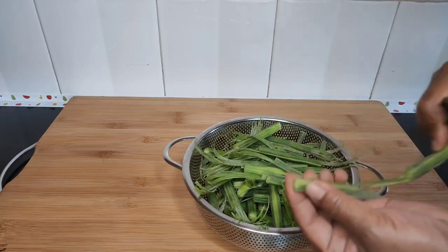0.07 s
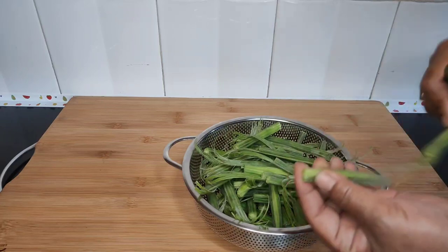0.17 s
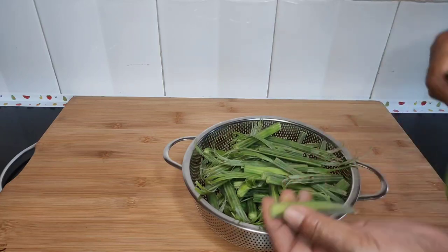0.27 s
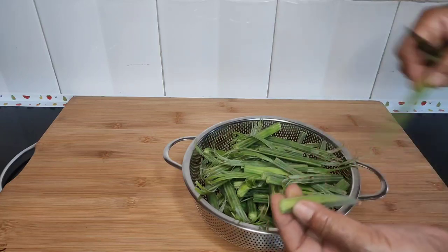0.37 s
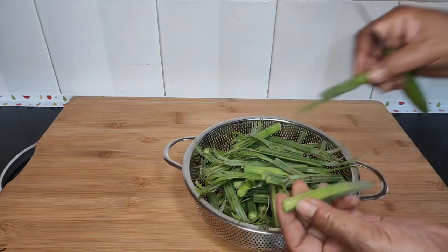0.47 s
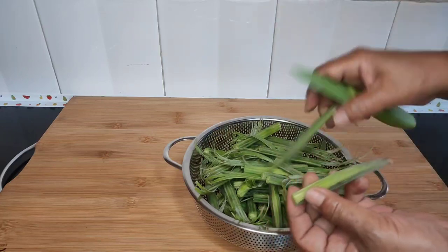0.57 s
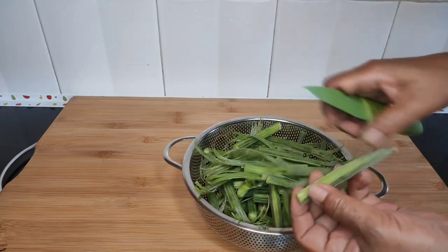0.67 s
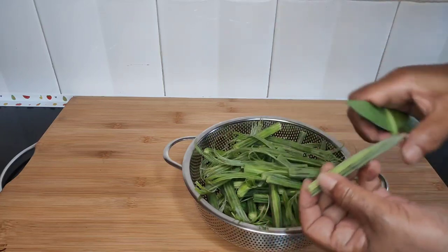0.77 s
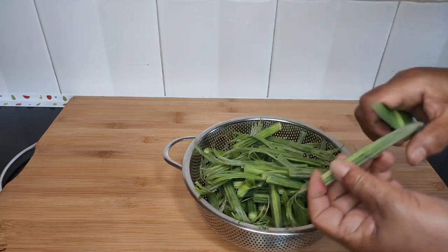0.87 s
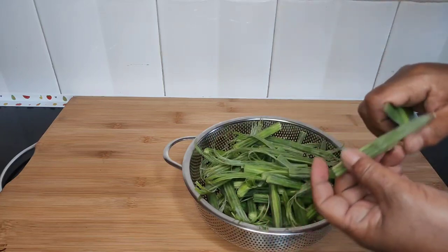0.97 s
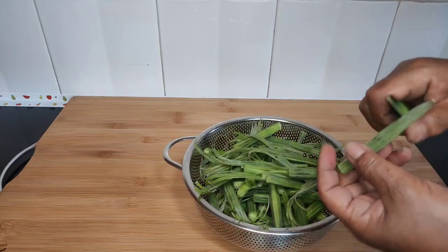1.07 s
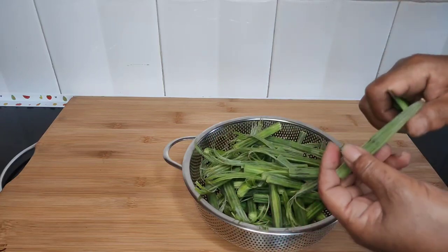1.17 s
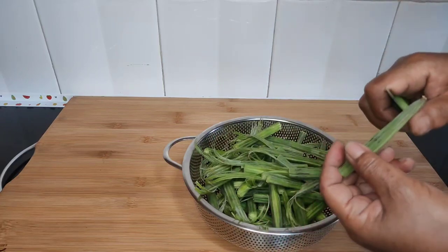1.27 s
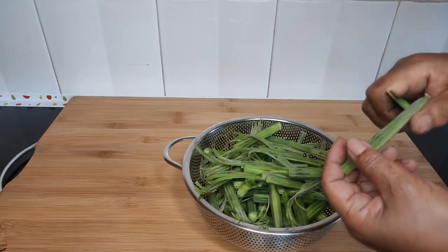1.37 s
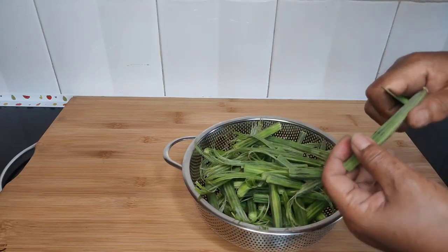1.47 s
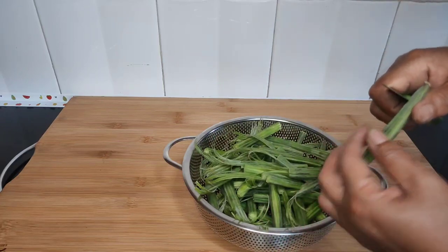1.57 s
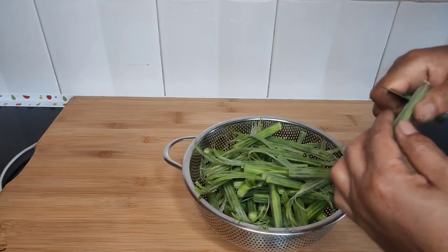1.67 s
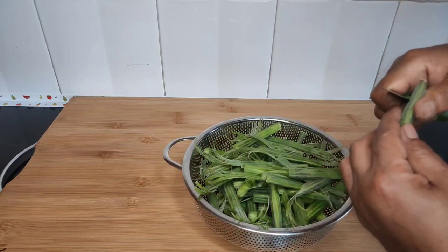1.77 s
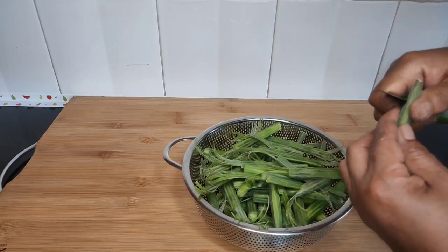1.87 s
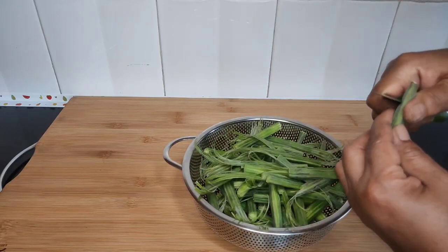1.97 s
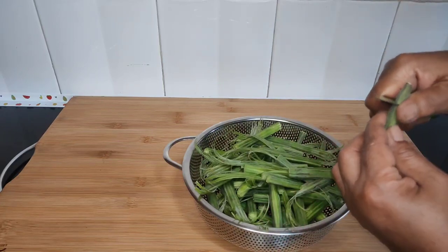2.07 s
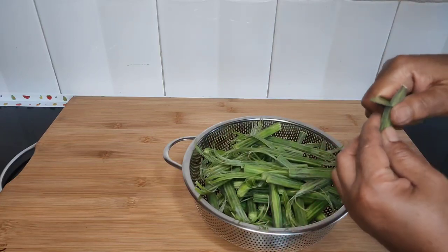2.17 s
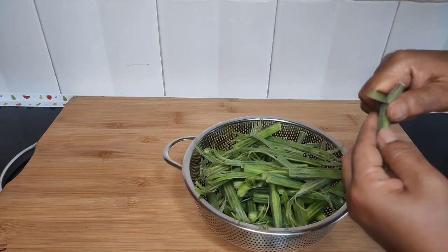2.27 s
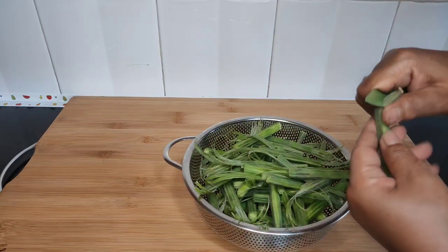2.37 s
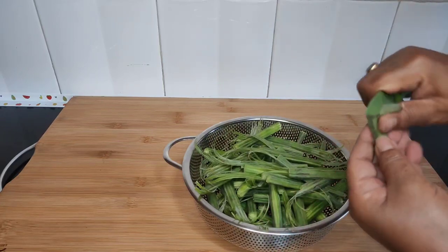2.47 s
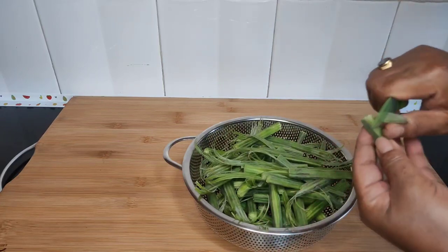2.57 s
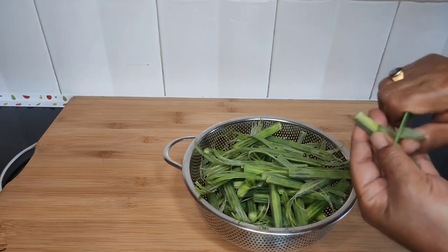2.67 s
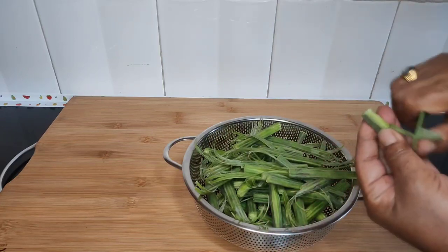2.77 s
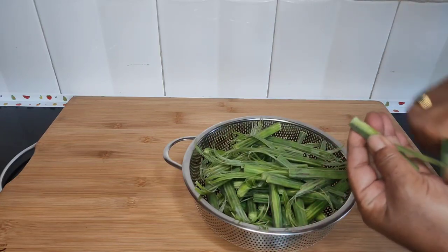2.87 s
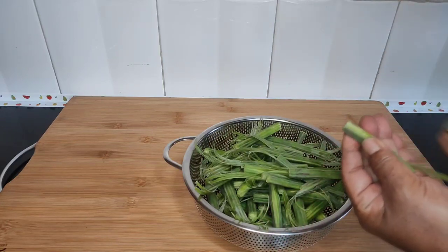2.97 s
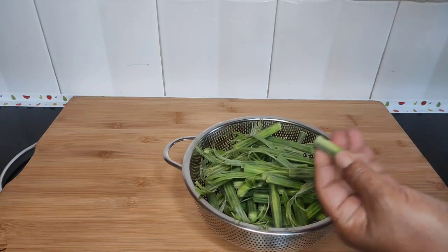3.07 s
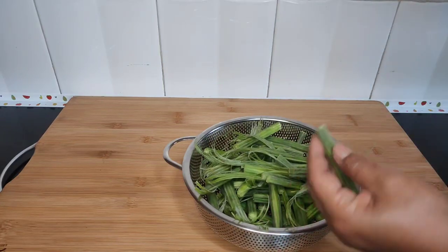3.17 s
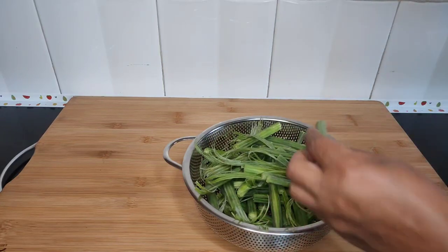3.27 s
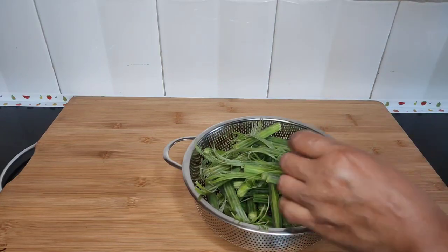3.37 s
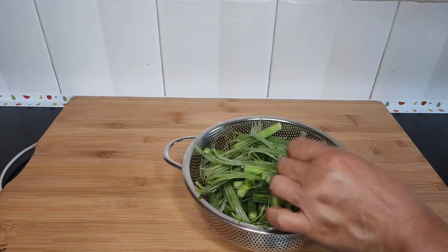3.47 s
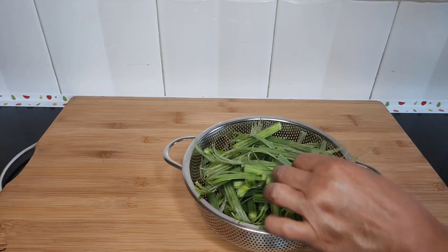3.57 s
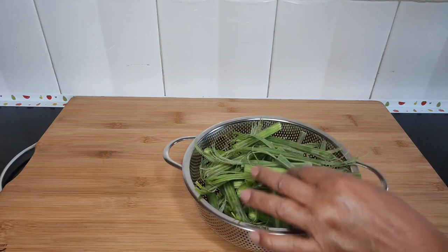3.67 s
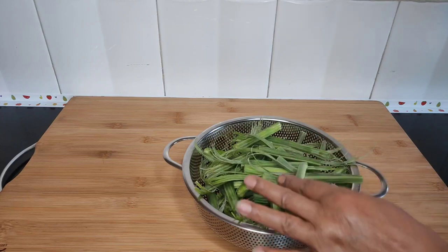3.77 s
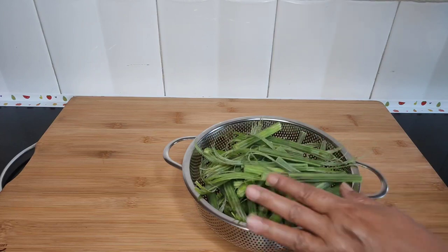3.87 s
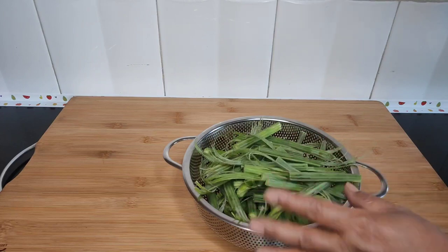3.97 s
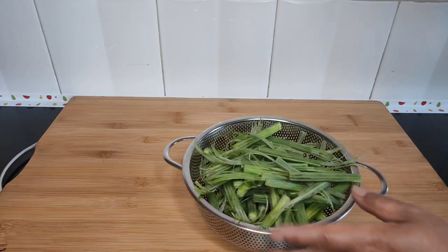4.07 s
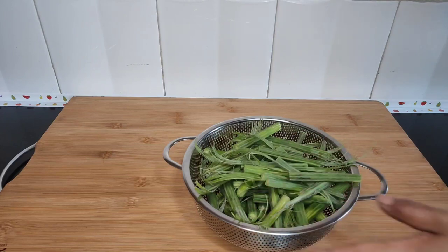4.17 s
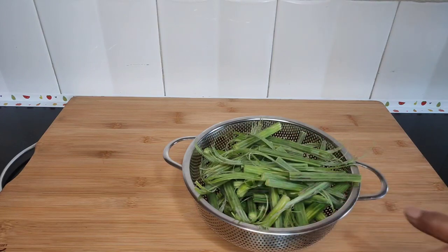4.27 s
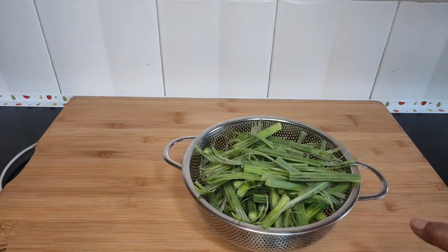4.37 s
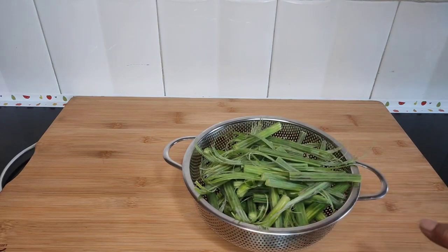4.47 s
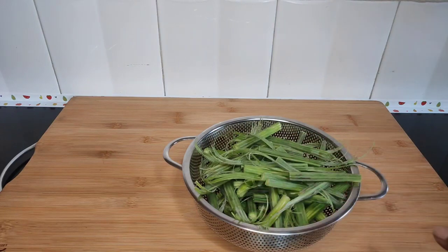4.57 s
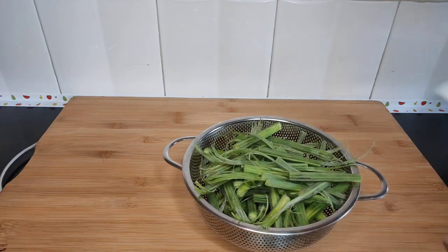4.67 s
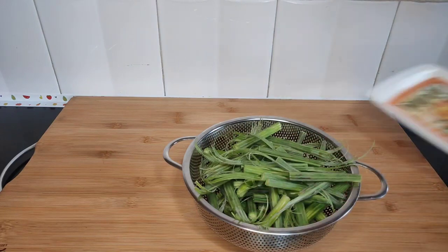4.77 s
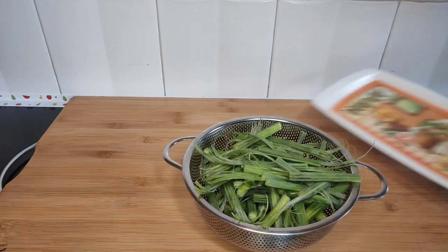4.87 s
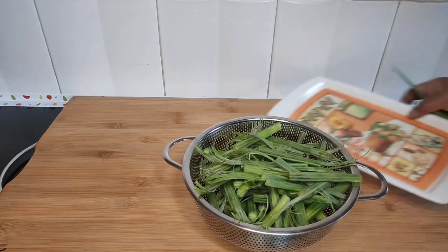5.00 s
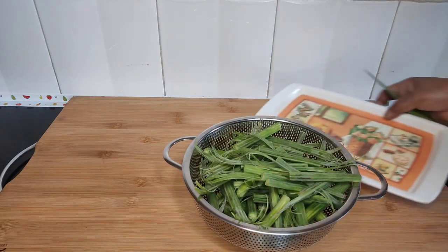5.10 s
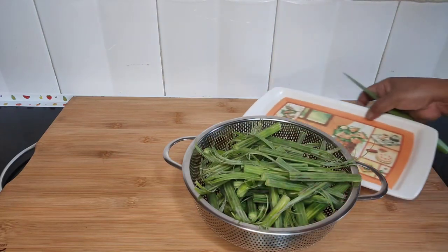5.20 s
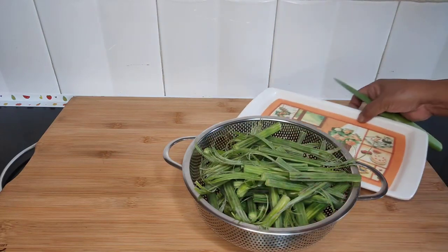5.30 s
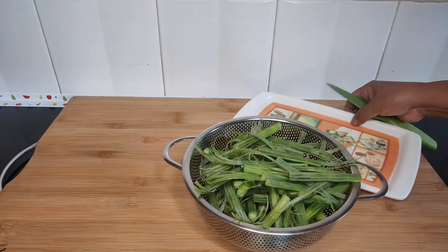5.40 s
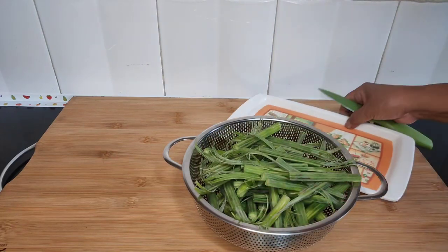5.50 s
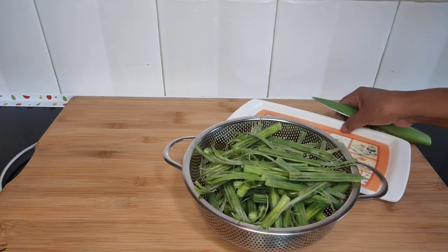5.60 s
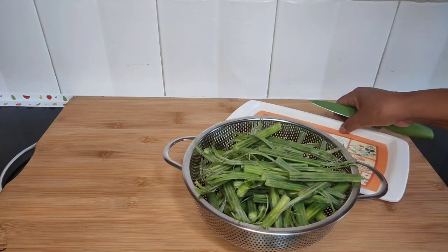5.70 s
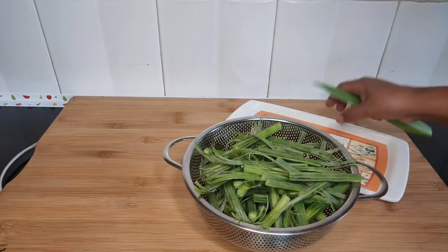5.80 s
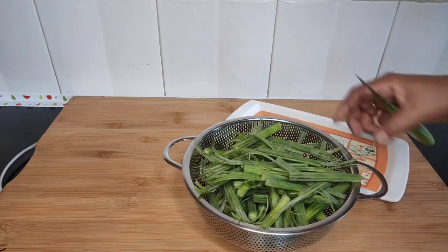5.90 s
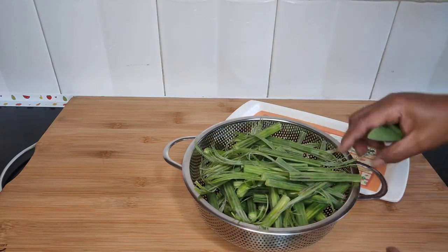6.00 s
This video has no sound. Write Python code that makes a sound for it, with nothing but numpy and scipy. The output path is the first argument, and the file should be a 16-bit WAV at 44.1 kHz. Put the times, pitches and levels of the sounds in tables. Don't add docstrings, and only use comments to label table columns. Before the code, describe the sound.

Faint skin rubbing and a crunchy pod break over quiet hum, followed by a hollow plastic tray slapping down on wood in a tiled room.

```python
import sys
import numpy as np
from scipy import signal
from scipy.fft import rfft, irfft, next_fast_len
from scipy.io import wavfile
from scipy.ndimage import uniform_filter1d

SR = 44100
rng = np.random.default_rng(int(sys.argv[2]) if len(sys.argv) > 2 else 0)


def ratio(d):
    e = np.asarray(d, float) / 20
    return 10 ** e


def wrap_up_sound(samples):
    columns = np.atleast_2d(samples).T
    tamed = np.clip(columns, -1, 1)
    steps = np.round(tamed * 32767).astype(np.int16)
    wavfile.write(sys.argv[1], SR, steps)


N = 266364

# (f/Hz, level/dB, t60/s)
FLAT_MODES = [(321, -5, 0.058), (712, -4.5, 0.093), (783.3, -8.5, 0.19), (877, -7.5, 0.084),
              (992, -2.5, 0.069), (1022, -3.5, 0.13), (1071, -1, 0.049), (1280, -7, 0.1),
              (1478, -0.5, 0.04), (1655, -18, 0.16), (2215, -9, 0.062), (2385, -10, 0.09),
              (2680, -24, 0.054), (2925, -6.5, 0.068), (3570, -17.5, 0.048)]
# (f/Hz, level/dB)
PLATE = [(71, -62.5), (120, -23.5), (296, -18.5), (550, -14), (1010, -5), (1200, -12.5), (1900, -12),
         (2960, -17), (3860, -27), (7440, -49), (8270, -62), (10800, -93), (18200, -120)]


def evened(x):
    return x / np.sqrt(np.mean(x ** 2) + 1e-20)


def read(points, hz):
    f, value = np.transpose(points)
    return np.interp(np.log(hz + 1), np.log(f + 1), value)


def add(mix, s, sound):
    part = mix[round(s * SR):][:len(sound)]
    part += sound[:len(part)]


def coloured(x, db_of_hz):
    size = next_fast_len(len(x))
    gain = ratio(db_of_hz(np.fft.rfftfreq(size, 1 / SR)))
    return irfft(rfft(x, size) * gain, size)[:len(x)]


def resonate(x, hz, width):
    turn = np.exp(2j * np.pi * np.cumsum(hz * np.ones(len(x))) / SR)
    r = np.exp(-np.pi * width / SR)
    smooth = signal.lfilter([1 - r], [1, -r], x / turn + 1e-18)
    return 2 * (turn * smooth).real


def slow(per_s, count):
    knots = rng.standard_normal(280)
    return evened(np.interp(np.arange(count) / SR * per_s, np.arange(len(knots)), knots))


def grit(count, per_s, spread_db):
    happens = rng.random(count) < per_s / SR
    size = rng.exponential(1, count)
    sign = rng.choice([-1., 1.], count)
    return happens * sign * ratio(spread_db * np.minimum(size, 4))


def swells(rows, rest_db):
    t = np.arange(N) / SR
    return ratio(rest_db) + sum(ratio(db) * np.exp(-((t - s) / half) ** 2) for s, half, db in rows)


def strokes(rows, t):
    return np.max([ratio(db - np.maximum(rise * (s - t), fall * (t - s))) for s, db, rise, fall in rows], axis=0)


def air():
    # (f/Hz, level per Hz/dB)
    air_colour = [(8.8, -40), (15, 3), (38, 1), (69, -14), (86, -5), (124, -4.5), (180, -10), (205, -11),
                  (330, -13), (441, -15), (477, -18), (2090, -32.5), (3650, -35), (7250, -42), (8270, -53),
                  (10800, -79), (18200, -120)]
    # (t/s, half length/s, peak/dB)
    puffs = [(.13, 0.058, -46), (.325, 0.037, -43.5), (.62, .1, -60), (.96, 0.025, -54),
             (1.16, 0.037, -53.5), (2.48, 0.089, -52), (2.94, 0.037, -51.5), (3.15, 0.12, -53),
             (3.49, 0.042, -44), (3.82, 0.016, -50), (4.3, 0.11, -54), (4.93, .05, -62), (5.27, 0.091, -54),
             (5.78, 0.037, -45.5), (6.03, 0.034, -48)]
    frames = N // 256 + 5
    a, b, patches = rng.standard_normal((frames, 513, 3)).T
    patches = uniform_filter1d(patches, size=10, axis=0)
    patches = evened(uniform_filter1d(patches, size=12, axis=1))
    patchy = signal.istft((a + 1j * b) * ratio(0.79 * patches), nperseg=1024, noverlap=768)[1][:N]
    room = ratio(-54) * evened(coloured(patchy, lambda f: read(air_colour, f)))
    push = evened(resonate(resonate(rng.standard_normal(N), 26, 40), 25, 27))
    return room + push * swells(puffs, rest_db=-66.5)


def street():
    # (t/s, half length/s, level/dB)
    street_swells = [
        (1.7, .3, -67),
        (2.99, .05, -56),
        (3.38, .12, -63),
        (3.96, 0.09, -63),
    ]
    wash = evened(resonate(resonate(rng.standard_normal(N), 680, 340), 460, 420))
    return ratio(-6.0) * swells(street_swells, rest_db=-67.5) * wash


def fridge():
    # (f/Hz, level/dB, width/Hz, wavering/dB)
    hums = [(101, -65, 20.5, -2.5), (177.9, -58.5, 2.64, 0), (366.4, -73, 9.6, 4), (375.6, -74, 7.4, 6.5),
            (441.4, -70.5, 7.26, 3.5), (2230, -83.5, 3.6, 1), (2390, -82, 3.2, 1.5)]
    # f/Hz, then faint resting level/dB
    whine_hz = (3586, 2246)
    whine_rest_db = (-86, -85.5)
    # (t/s, half length/s, level/dB)
    high_spells = [(.45, 0.069, -78), (.8, 0.055, -86), (1.03, 0.087, -82), (1.23, 0.07, -84),
                   (1.5, .07, -83), (1.681, .02, -86), (1.86, 0.11, -80.5), (2.48, 0.11, -79),
                   (3.4, .1, -80), (3.63, .04, -71), (3.97, 0.088, -81), (4.16, 0.04, -79),
                   (4.97, 0.11, -80), (5.9, .1, -86)]
    low_spells = [(.09, .05, -81), (.62, .12, -86), (.93, 0.067, -89), (1.53, .05, -87), (2.45, 0.14, -94),
                  (3.17, .06, -84), (3.45, 0.14, -82), (3.76, .06, -81), (4.1, 0.088, -85), (4.9, .15, -82),
                  (5.8, 0.047, -80)]
    t = np.arange(N) / SR
    out = np.zeros(N)
    for hz, db, width, waver_db in hums:
        turns = np.cumsum(hz + width / 2 * slow(25, count=N)) / SR
        level = np.sqrt(2) * ratio(db + waver_db * slow(14, count=N))
        out += level * np.sin(2 * np.pi * turns)
    for hz, spells, rest_db in zip(whine_hz, (high_spells, low_spells), whine_rest_db):
        fuzz = evened(resonate(resonate(rng.standard_normal(N), hz, 45), hz, 70))
        whistle = 0.99 * fuzz + 1.3 * np.sin(2 * np.pi * hz * t)
        out += swells(spells, rest_db) * whistle
    return out


def buzz():
    # (delay/s, level/dB)
    spikes = [(.00507, -60), (.01372, -60), (.00815, -67), (.0162, -68), (.0001, -69)]
    # (f/Hz, level/dB)
    spike_colour = [(800, -30), (2500, 0), (4000, 2), (6000, 0.7), (8000, -0.5)]
    hz = 60.004 * np.arange(12, 140)
    cycle = sum(ratio(db) * 1j * np.exp(-2j * np.pi * hz * s) for s, db in spikes)
    cycle = cycle * ratio(read(spike_colour, hz)) / 100
    lines = np.zeros(5 * N + 1, complex)
    lines[np.round(hz * 10 * N / SR).astype(int)] = cycle
    return irfft(lines, 10 * N)[:N] * 10 * N * ratio(1.2 * slow(38, count=N) - 1.5)


def kitchen(x, early):
    # (f/Hz, t60/s)
    dying = [(200, 0.96), (700, 0.94), (1500, 0.63), (3000, 0.54), (6000, 0.85)]
    taps = np.zeros(SR)
    at = np.arange(60, SR - 20, 20)
    taps[at + rng.integers(0, 20, len(at))] = rng.choice([-1., 1.], len(at))
    hz, t, z = signal.stft(taps, SR, nperseg=256)
    tail = signal.istft(z * ratio(-60 * t / read(dying, hz)[:, None]), SR, nperseg=256)[1]
    tail *= 1 + early * np.exp(-np.arange(len(tail)) / SR / 0.0094)
    return signal.fftconvolve(x, tail / np.linalg.norm(tail))[:N]


def bumps():
    # (t/s, peak/dB, f/Hz, t60/s)
    pushes = [
        (.72, -50.5, 409, 0.27),
        (2.088, -31, 299, 0.048),
        (2.092, -36, 28, .12),
        (3.0, -50.5, 627, 0.13),
        (5.322, -32, 96.4, 0.14),
    ]
    out = np.zeros(N)
    t = np.arange(SR // 2) / SR
    for s, db, hz, t60 in pushes:
        push = ratio(db - 60 * t / t60) * (1 - np.exp(-t * hz / 3))
        add(out, s, push * np.sin(2 * np.pi * hz * t))
    return out


def rub(rows, start, end, grit_db, hz, width, dull_db):
    # (f/Hz, level/dB)
    grit_colour = [(400, -16), (1700, 10.5), (5000, 8.0), (8000, 2.5)]
    t = np.arange(start, end, 1 / SR)
    slips = evened(grit(len(t), 5000, 2.4)) * ratio(2.5 * slow(38.0, count=len(t)))
    rasp = evened(resonate(resonate(slips, hz, width), hz, width))
    broad = evened(coloured(slips, lambda f: read(grit_colour, f) + dull_db * f / 8000))
    press = strokes(rows, t)
    share = ratio(grit_db) * np.minimum((press.max() / press) ** 2, ratio(7.5))
    both = (rasp + share * broad) / np.sqrt(1 + share ** 2)
    return start, press * both * signal.windows.tukey(len(t), .08)


def rubbing():
    # (t/s, peak/dB, rise/(dB/s), fall/(dB/s))
    grip_strokes = [
        [(.05, -63.5, 56, 150), (.204, -63, 595, 281), (.4, -87, 145, 50)],
        [(2.108, -51.5, 900, 110)],
        [(2.62, -67, 400, 52), (2.655, -54, 1700, 650)],
        [(2.78, -64, 900, 40), (2.836, -60, 90, 90)],
        [(2.95, -54, 128, 60), (2.974, -44, 1500, 500), (3.012, -64, 200, 800)],
        [(3.04, -68, 100, 90), (3.16, -68, 60, 150)],
        [(3.31, -68, 170, 69), (3.364, -63, 550, 200), (3.464, -67.5, 180, 40)],
        [(4.32, -59, 401, 33), (4.41, -54, 400, 100)],
        [(4.76, -67.5, 59.5, 29), (4.976, -61.5, 1200, 1203), (5.032, -69, 199, 500),
         (5.126, -66.5, 259, 569.5)],
        [(5.615, -51, 53, 348)],
        [(2.95, -64, 700, 200), (3.0, -62, 450, 200), (3.013, -58, 100, 1200)],
    ]
    # (start/s, end/s, broad grit against rasp at the hardest press/dB)
    grips = [(0.0, .45, 2), (2.104, 2.3, 1.5), (2.581, 2.76, -2), (2.759, 2.877, 3), (2.849, 3.034, -5),
             (3.039, 3.216, 2), (3.25, 3.6, -4), (4.272, 4.415, -4), (4.718, 5.14, -7), (5.522, 5.7, 21.5),
             (2.93, 3.037, 6)]
    # (f/Hz, width/Hz, treble slope of the grit/dB)
    rasps = [(4170, 3900, 1), (2900, 1200, 5), (5130, 1700, -4), (4200, 1800, -2), (2170, 450, 1.5),
             (3450, 1800, -4), (3550, 980, -16), (2520, 2200, -15), (3420, 730, -13), (4840, 4000, -22),
             (5900, 3100, 2)]
    out = np.zeros(N)
    for rows, grip, rasp in zip(grip_strokes, grips, rasps):
        add(out, *rub(rows, *grip, *rasp))
    return out


def snap(s, db, length, middle_db, treble_db):
    # (f/Hz, width/Hz, level/dB, part: 0 low, 1 middle, 2 treble)
    pod_wall = [(556, 1200, -7, 2), (1290, 690, -1, 0), (2600, 680, 0, 2.2), (3200, 600, -9, 1),
                (4520, 600, 2.5, 2), (6200, 500, -1.5, 2), (7050, 750, 0.5, 2.2)]
    t = np.arange(1600) / SR
    breaks = min(length / 0.0039, .9) * grit(len(t), 7000, 1.7) * np.exp(-t / max(length, 2e-4))
    breaks[0] = 1
    part_db = (0, middle_db, treble_db)
    ring = np.zeros(len(t))
    for hz, width, g, part in pod_wall:
        peak = resonate(resonate(breaks, hz, width), hz, 2 * width)
        ring += ratio(g + part_db[int(part)]) / width * peak
    return s, ratio(db) * ring / np.abs(ring).max()


def snapping():
    # (t/s, peak/dB, middle/dB, treble/dB)
    pulls = [
        (0.187, -53, -9, -6),
        (0.207, -49.5, -8, -8),
        (0.369, -56, -12, 11),
    ]
    # (t/s, peak/dB, tear length/s, middle/dB, treble/dB)
    breaks = [(1.9598, -35, 0.0023, -2, -8), (1.9616, -29, 0.00093, -10, 0.5),
              (1.9837, -28, 0.0015, -9, -4), (2.0013, -35.5, .001, -7, -6), (2.005, -32, 0.0014, -1, -5),
              (2.0464, -36.5, 0.0015, 1, -5), (2.049, -34, 0.0016, -15, -12), (2.081, -46, .001, -4, -4),
              (2.087, -24.5, 0.00072, -19, -14), (2.0897, -23.5, 0.0035, 4, 2), (2.103, -36, 0.003, 9, 6)]
    # (t/s, peak/dB, middle/dB, treble/dB)
    ticks = [(2.409, -50, 7, 3.5), (2.473, -55, -3, 8), (2.504, -49, 5, 8), (2.533, -48.5, 9, 3),
             (2.557, -54, -1, 7), (2.609, -52, -3, -2), (2.628, -46, -8, 4), (2.6495, -42, 4, 15),
             (2.655, -36.5, 11, 18), (2.679, -44.5, 7, 10), (2.78, -62, 11, -10), (2.971, -47.5, 14, -7),
             (2.983, -53, 15, -7), (3.009, -42.5, 8, 4), (3.3645, -53, 3, -15), (3.471, -53, -1, -11),
             (3.941, -46.5, 6, -6), (4.817, -51.5, 1.5, -18), (4.975, -48, 2, -19)]
    out = np.zeros(N)
    for rows, tear_s in (pulls, .007), (ticks, 0.0034):
        for s, db, middle_db, treble_db in rows:
            add(out, *snap(s, db, tear_s, middle_db, treble_db))
    for row in breaks:
        add(out, *snap(*row))
    return out


def chatter():
    # (t/s, peak/dB, rise/(dB/s), fall/(dB/s))
    touches = [
        (5.35, -20, 901, 1501.5),
        (5.37, -39.5, 901, 4),
        (5.66, -56, 900, 33),
        (5.728, -38, 1101, 1099),
    ]
    span = (5.35, 5.95)
    t = np.arange(*span, 1 / SR)
    settling = np.where(t < 5.63, strokes(touches[:2], t), 0)
    level = settling + strokes(touches[2:], t)
    taps = grit(len(t), 1500, 2.8) * ratio(3.5 * np.cos(2 * np.pi * 31 * (t - 5.39)))
    ring = sum(ratio(g - hz / 200) * resonate(taps, hz, 70) for hz, g, _ in FLAT_MODES)
    wash = coloured(taps, lambda f: read(PLATE, f) + f / 2500)
    both = evened(evened(ring) + 1.2 * evened(wash))
    return t[0], ratio(-9.5) * level * both * signal.windows.tukey(len(t), .1)


def contact(modes, s, db, hard_db, thud_db, hold):
    t = np.arange(SR // 2) / SR

    def shade(hz):
        treble = (hard_db + 19.5) * np.clip((hz - 1500) / 2000, 0, 1.5)
        return treble + (thud_db + 20.5) * np.clip((400 - hz) / 100, 0, 1)

    def wash_db(f):
        gap = np.exp(-((f - 520) / 130) ** 2)
        return read(PLATE, f) + shade(f) + 0.57 * (thud_db + 16.0) * gap

    ring = np.zeros(len(t))
    for hz, g, t60 in modes:
        split, phase = rng.uniform(-0.9, 1, (2, 3, 1))
        near_hz = hz + [[0], [30], [45]] * split
        cluster = np.sin(2 * np.pi * (near_hz * t + phase)).T @ [1, .35, .25]
        fade = ratio(g + shade(hz) - 60 * t / (t60 * max(hold, .1)))
        ring += fade * (1 - np.exp(-t * hz / 2.16)) * cluster
    wash = evened(coloured(rng.standard_normal(len(t)), wash_db))
    crack = wash * (ratio(-60 * t / 0.037) + 0.43 * ratio(-60 * t / 0.11)) * np.minimum(t / 0.00058, 1)
    blow = ring / np.abs(ring).max() + 0.39 * crack
    return s - .0009, ratio(db) * blow / np.abs(blow).max()


def tray_blows():
    # (t/s, peak/dB, hardness/dB, thud/dB, ring length as a factor)
    grab = [
        (4.3962, -43.5, -22, -23, 0.87),
        (4.4116, -28.5, -14, -19, 0.63),
        (4.4202, -25, -10, -22, 0.74),
    ]
    lift = [
        (4.4638, -18.5, -15.5, -26.5, 0.97),
        (4.4685, -25, -17.5, -30.5, 0.9),
    ]
    corner = [
        (5.159, -8.5, -17.5, -22, 0.71),
        (5.2005, -25.5, -32.5, -30, 0.5),
        (5.207, -21, -39, -31, 0.56),
        (5.2405, -28, -50, -37.5, 0.31),
        (5.262, -34.5, -49, -34, 0.45),
        (5.2795, -36.5, -38, -33, 0.5),
        (5.301, -34.5, -42, -30, 0.46),
    ]
    flat = [
        (5.3192, -12.5, -16, -14, 0.37),
        (5.3225, -8.5, -16.5, -17.5, 0.51),
        (5.3382, -5, -18, -24.5, 0.83),
        (5.39, -21, -37, -15, 1),
        (5.407, -28, -36, -25, 0.6),
        (5.421, -24.5, -36, -7, 1),
        (5.4867, -24.5, -39, -8.5, 0.43),
        (5.492, -29, -40, -11, 0.41),
    ]
    rest = [
        (5.6228, -25, -19, -20, 0.7),
        (5.678, -44, -26, -21, 1.5),
    ]
    last = [
        (5.7123, -44, -7, -25, 0.4),
        (5.7233, -25, -25.5, -15, 0.75),
        (5.7276, -26, -23.5, -11, 0.62),
    ]
    # (f/Hz, level/dB, t60/s)
    grab_modes = [(336, -8.5, 0.097), (991, -7, 0.13), (986, -3.5, 0.065), (1275, -4, 0.11),
                  (1450, 1, 0.099), (1900, -7, 0.1), (2340, -9.5, 0.11), (2380, -7, 0.039),
                  (2980, -24, .06)]
    lift_modes = [(318, -3.5, 0.23), (757, -5.5, 0.17), (823, -10.5, 0.25), (890, -11, 0.3),
                  (925, -6.5, 0.3), (1004, -0.5, 0.095), (1210, -9.5, 0.091), (1306, 1.5, 0.18),
                  (1407, -13, 0.18), (1777, -7.5, 0.18), (1880, 1, 0.063), (2140, -12.5, 0.082),
                  (2485, -10.5, 0.18), (2680, -21, .12)]
    corner_modes = [(328, -5, 0.22), (460, -8, 0.086), (711, 1, 0.08), (782, -3, 0.13), (1040, -10, 0.17),
                    (1080, -11, 0.19), (1294, -10.5, 0.23), (1378, -9, 0.1), (1777, -9, 0.32),
                    (2175, -10.5, 0.078), (2553, -12.5, 0.09), (2926, -9.5, 0.063), (3054, -12.5, 0.1),
                    (3366, -16, 0.051), (4140, -20.5, 0.066)]
    rest_modes = [(423, -0.5, 0.13), (475, 0, 0.044), (554, -9, 0.16), (761, 2.5, 0.12), (865, -9, .08),
                  (985, -16, 0.07), (1340, -12, 0.038), (1600, -20, 0.05), (2120, -12, 0.041),
                  (2370, -11, .05), (2810, -13, .04)]
    last_modes = [(458, -3.5, 0.086), (540, -2.5, 0.073), (754, -11, 0.27), (853, -3.5, 0.092),
                  (1028, -1.5, 0.056), (1340, -6, .045), (1610, -6.5, .05), (1880, -4.5, 0.031),
                  (2430, -10, 0.058), (2660, -14, .035)]
    out = np.zeros(N)
    for modes, blows in ((grab_modes, grab), (lift_modes, lift), (corner_modes, corner),
                         (FLAT_MODES, flat), (rest_modes, rest), (last_modes, last)):
        for row in blows:
            add(out, *contact(modes, *row))
    return out


def scene():
    steady = air() + street() + fridge() + buzz()
    pods = bumps() + rubbing() + snapping()
    tray = tray_blows()
    add(tray, *chatter())
    sway = .00011 * SR * slow(44, count=N)
    shaken = np.interp(np.arange(N) + sway, np.arange(N), tray)
    echoes = ratio(-8.5) * kitchen(pods, early=6.5) + ratio(-8.0) * kitchen(shaken, early=0.26)
    return (steady + pods + tray + echoes)[None]


def roll_off(x):
    return signal.sosfilt(signal.butter(12, 8440, fs=SR, output="sos"), x)


def record(dry):
    lowpass = signal.firwin(161, 7830, window=("kaiser", 8.5), fs=SR)
    narrow = signal.oaconvolve(dry, lowpass[None], "same")
    hiss = ratio(-86.5) * rng.standard_normal(dry.shape)
    return roll_off(narrow + hiss)


dry = scene()
out = record(dry)
wrap_up_sound(out)
```